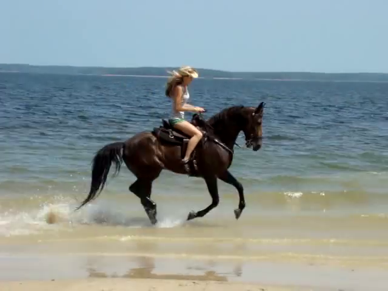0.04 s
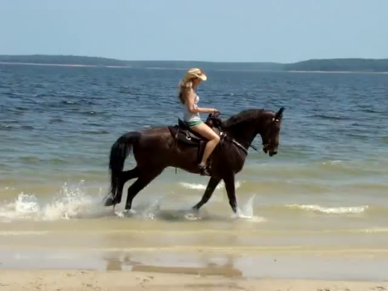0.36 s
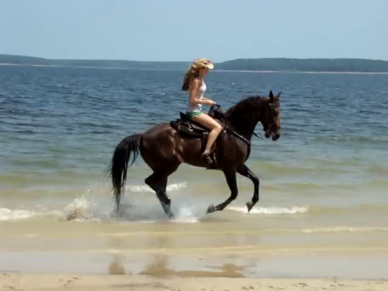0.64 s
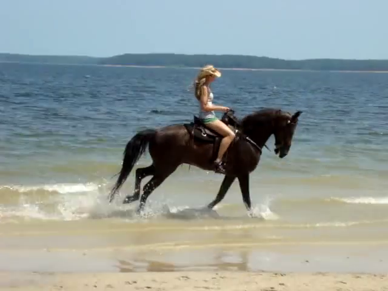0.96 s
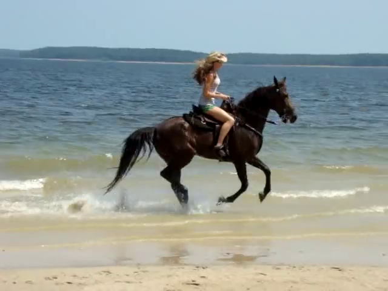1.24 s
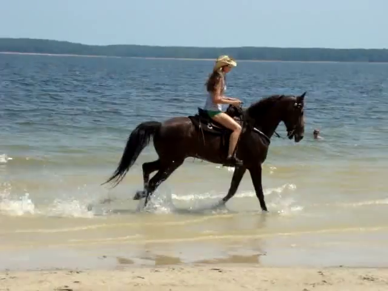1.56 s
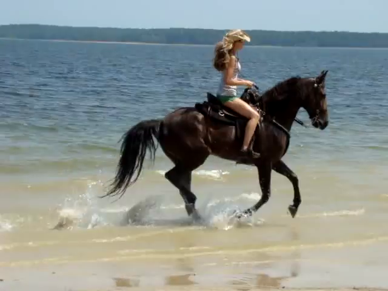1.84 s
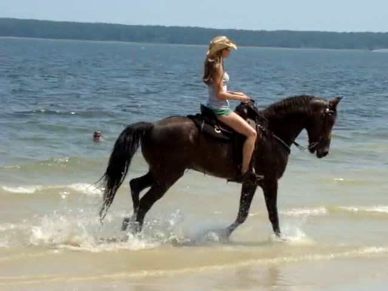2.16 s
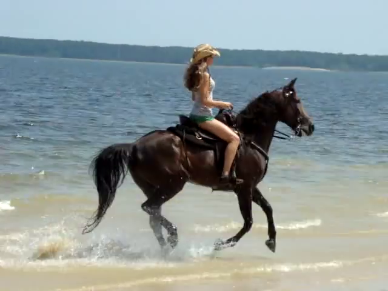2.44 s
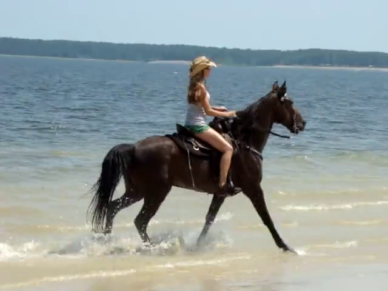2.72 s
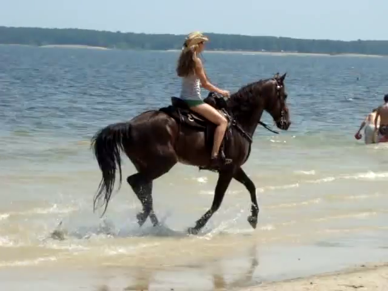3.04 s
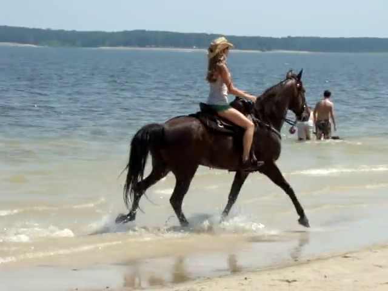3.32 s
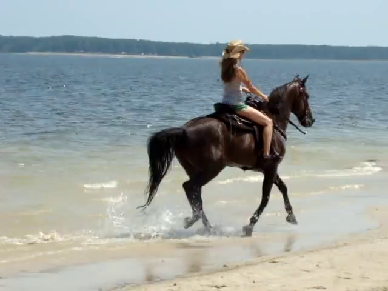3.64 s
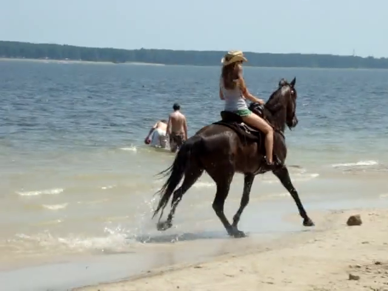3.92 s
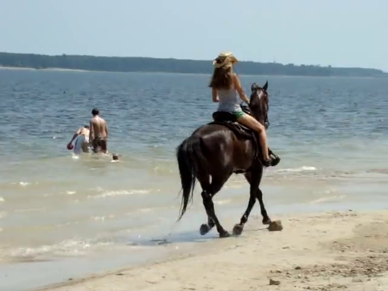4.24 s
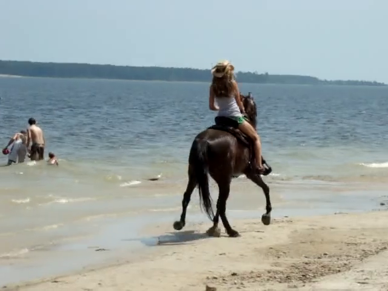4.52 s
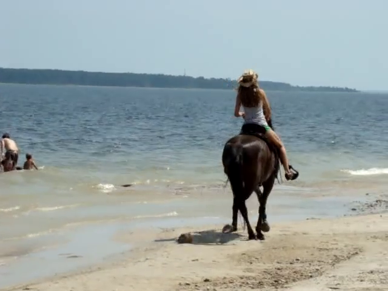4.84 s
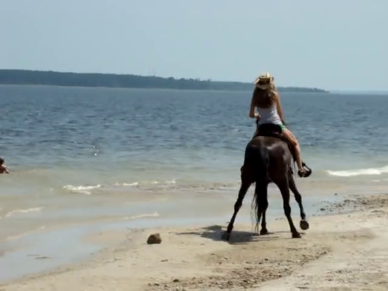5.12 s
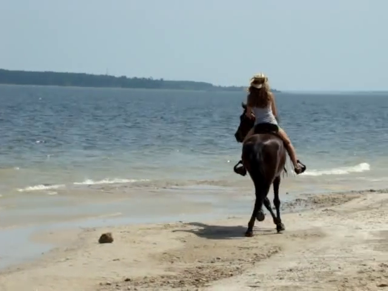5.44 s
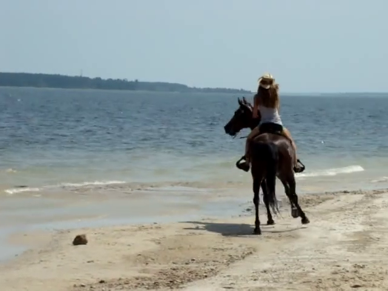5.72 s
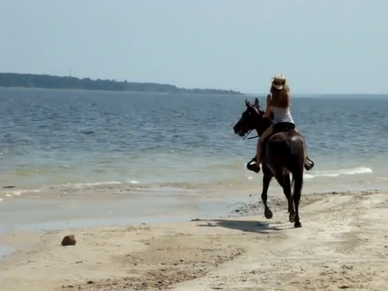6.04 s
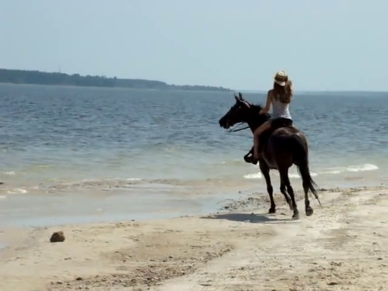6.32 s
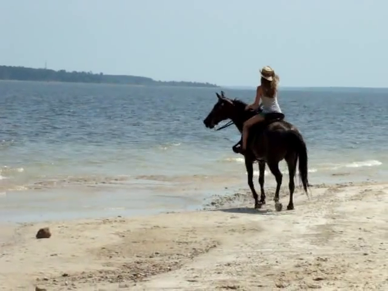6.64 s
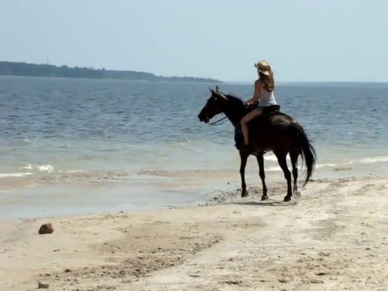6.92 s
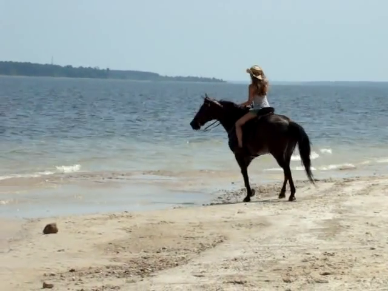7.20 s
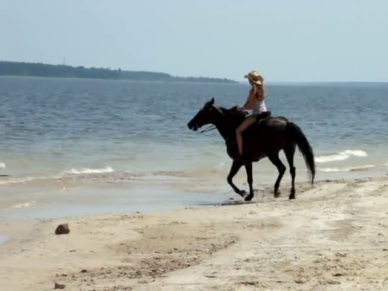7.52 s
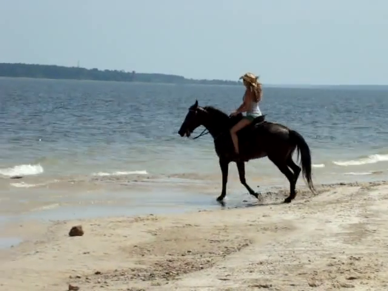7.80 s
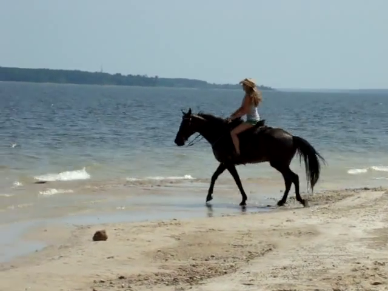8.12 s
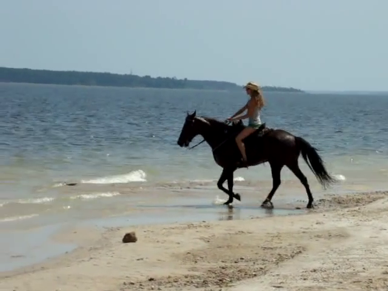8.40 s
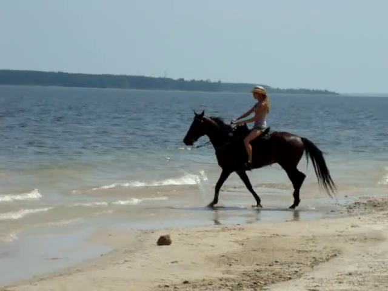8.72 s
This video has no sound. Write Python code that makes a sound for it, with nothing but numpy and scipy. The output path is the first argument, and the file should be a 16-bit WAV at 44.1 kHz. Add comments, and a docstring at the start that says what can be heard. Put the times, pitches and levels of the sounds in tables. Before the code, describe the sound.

A horse moves briskly through the shallows of a lake, each hoof landing with a slap, a gurgle and a patter of falling drops. Small waves wash steadily along the shore. Partway through, one long gust rumbles and thumps on the outdoor microphone. The splashing and the gust die away at about the same time, leaving the waves, with two faint wet steps near the end.

```python
"""A horse ambles through the shallows of a windy lake, steps out on to the sand and walks back
to the water's edge. Each hoof slaps the surface and raises a crown of water that falls back as drops.
Some steps gulp in a pocket of air that rings as a bubble, and lifting hooves fling spray.
Small waves wash along the shore throughout, and one long gust buffets the microphone."""
import sys
import numpy as np
from scipy import signal
from scipy.fft import rfft, irfft
from scipy.io import wavfile

SR = 44100
rng = np.random.default_rng(int(sys.argv[2]) if len(sys.argv) > 2 else 0)


def persist_wave(psi):
    """Save psi, clipped to +-1, as 16-bit WAV."""
    counts = np.round(np.clip(psi, -1, 1) * 32767).astype(np.int16)
    wavfile.write(sys.argv[1], SR, np.atleast_2d(counts).T)


N = 395136


def from_db(db):
    """Turn decibels into a number to multiply a sound by."""
    return 10 ** (np.asarray(db) / 20)


def rms_one(x):
    """Scale x so that its average strength (rms) is one."""
    return x / np.sqrt(np.mean(x ** 2) + 1e-20)


def seconds():
    """The time of every sample."""
    return np.arange(N) / SR


def in_time(rows):
    """Join (time, value) rows by straight lines."""
    return np.interp(seconds(), *np.transpose(rows))


def coloured(x, tone):
    """Shape x by (pitch, level) rows, fading steeply past both ends; the result has strength one."""
    hz, db = np.transpose(tone)
    octave, knots = np.log2(np.fft.rfftfreq(N, 1 / SR) + 1), np.log2(hz)
    octaves_outside = np.abs(octave - np.clip(octave, knots[0], knots[-1]))
    gain = from_db(np.interp(octave, knots, db) - 20 * octaves_outside)
    return rms_one(irfft(rfft(x) * gain, N))


def noise(tone):
    """A steady rush with the given tone."""
    return coloured(rng.standard_normal(N), tone)


def drift(rate_hz):
    """A smooth random wobble of strength one; a higher rate wobbles faster."""
    hop, warm_up = 40, 2000
    r = np.exp(-2 * np.pi * rate_hz * hop / SR)
    jitter = rng.standard_normal(N // hop + warm_up + 2)
    slow = signal.lfilter([1], [1, -2 * r, r * r], jitter)[warm_up:]
    return np.interp(np.arange(N) / hop, np.arange(len(slow)), rms_one(slow))


def swell(time_s, half_s):
    """The samples around a moment, and a bell-shaped rise and fall over them."""
    at = np.arange(max(int((time_s - 4 * half_s) * SR), 0), min(int((time_s + 4 * half_s) * SR), N))
    return at, np.exp(-.5 * ((at / SR - time_s) / half_s) ** 2)


def blend(layers, at, bright_db):
    """Mix the three layers of a splash: brighter means less of the low and more of the high."""
    low, middle, high = layers
    return from_db(-bright_db) * low[at] + middle[at] + from_db(bright_db) * high[at]


def drops(per_s, spread_db, cycles, clump_db, pitch_count=28):
    """Drops and bubbles of random size come in clumps, each ringing a few cycles at its own pitch."""
    starts = np.flatnonzero(rng.random(N) < per_s * from_db(clump_db * drift(25)) / SR)
    sizes = from_db(spread_db * np.minimum(rng.exponential(1, len(starts)), 4))
    sizes *= rng.choice([-1, 1], len(starts))
    pitches = np.geomspace(170, 10500, pitch_count)
    odds = np.sqrt(pitches) / np.sqrt(pitches).sum()   # small, high ones are more common
    picked = rng.choice(pitch_count, len(starts), p=odds)
    out = np.zeros(N)
    for k, hz in enumerate(pitches):
        clicks = np.full(N, 1e-18)
        clicks[starts[picked == k]] = sizes[picked == k]
        fade = np.exp(-np.log(1000) * hz / (max(cycles, 2) * SR))
        turn = 2 * np.pi * hz / SR
        ringing = signal.lfilter([1, 0, -1], [1, -2 * fade * np.cos(turn), fade * fade], clicks)
        out += np.sqrt(hz) * rms_one(ringing)
    return rms_one(out)


# How the waves on the shore rise and fall: (time [s], level [dB])
WAVE_LEVEL = [(0, -27), (1.05, -28), (2.6, -25.5), (3.9, -27.5), (4.7, -28.5), (6.2, -27.5), (6.6, -29),
              (7.75, -30), (8.1, -28.5), (8.96, -30)]
# The tone of the waves: (pitch [Hz], level [dB])
WAVE_TONE = [(40, -31), (90, -21), (160, -16), (220, -12), (330, -6), (500, -5.5), (750, 2), (1150, -3),
             (1550, -2), (2300, -7), (3100, -7), (4200, -13.5), (6700, -19.5), (10000, -24.5)]


def waves(gain_db=3.0, bubbles_db=-8, flutter_db=0.12):
    """Far-off little waves merge into a smooth rush; nearer ones add bubbling."""
    rush = rng.standard_normal(N)
    bubbling = from_db(bubbles_db) * drops(per_s=3000, spread_db=2.0, cycles=14.3, clump_db=2.5)
    level_db = in_time(WAVE_LEVEL) + gain_db + flutter_db * drift(4.9)
    return from_db(level_db) * coloured(rush + bubbling, WAVE_TONE)


# Water stirred by the legs, fading as the horse leaves the lake: (time [s], level [dB])
WADING_LEVEL = [(0, -30.5), (0.95, -33.5), (1.3, -32), (2.4, -33), (3.9, -34.5), (4.15, -39), (4.8, -40.5),
                (5.2, -49.5), (7.6, -56), (8.96, -45.5)]
# The tone of the stirred water: (pitch [Hz], level [dB])
WADING_TONE = [(130, -21), (210, -4), (400, -7.5), (700, 0.5), (1200, -19), (2100, -2.5), (3100, 2.5),
               (4300, -5.5), (7000, -6.5), (10000, -9)]


def wading(gain_db=1.9, flutter_db=1.5, stride_s=0.628, first_surge_s=0.044, surge_db=0.7):
    """Legs in the water keep up a patter of drops that surges once in each stride of four steps."""
    patter = coloured(drops(per_s=2400, spread_db=1.5, cycles=17, clump_db=2.5), WADING_TONE)
    surge = np.cos(2 * np.pi * (seconds() - first_surge_s) / stride_s)
    level_db = in_time(WADING_LEVEL) + surge_db * surge + gain_db + flutter_db * drift(28)
    return from_db(level_db) * patter


# The low gurgle, middle splash and high spray of struck water, each: (pitch [Hz], level [dB])
GURGLE_TONE = [(100, -18.5), (175, 1), (400, -5.5), (800, 5), (1300, -13.5), (2500, -13), (10000, -44)]
SPLASH_TONE = [(200, -25), (700, 0), (1500, -1.5), (3000, -0.5), (4500, -14), (10000, -22)]
SPRAY_TONE = [(500, -33), (2000, 1), (3500, 8), (5500, -1), (7500, -3), (10000, -3)]
# Each time a hoof lands: (time [s], level [dB], brightness [dB], fade time [s])
HOOF_STEPS = [(0.024, -27.5, 5, 0.011), (0.172, -27.5, -2, 0.023), (0.3265, -20, 3, 0.0078),
              (0.482, -22.5, 0, .006), (0.615, -30, 4, 0.028), (0.778, -25.5, -5.5, 0.027),
              (0.935, -19, 3.5, 0.0057), (1.084, -23, 0, .006), (1.210, -31, 6, .02),
              (1.360, -25.5, -3.5, 0.026), (1.530, -16.5, 1, 0.0035), (1.810, -22.5, 12.5, .0016),
              (1.967, -27, -9, .012), (2.110, -25, 4, .005), (2.359, -22, 1, 0.0062),
              (2.580, -26, -4, 0.023), (3.001, -19.5, -1, 0.0078), (3.183, -28, -7.5, 0.024),
              (3.310, -25, 1, 0.015), (3.583, -19, 3.5, .009), (3.787, -22, 1, 0.01),
              (4.066, -21.5, 0.5, 0.0035), (4.537, -30, -5, .012), (8.213, -36, -3, 0.028),
              (8.885, -35, -4, .016)]


def hooves(thud_db=-0.5, slap_db=0.9, spray_db=-3.0):
    """A hoof hits the water with a dull thud, a slap and a puff of spray."""
    thud = from_db(thud_db) * noise(GURGLE_TONE)
    slap = from_db(slap_db) * noise(SPLASH_TONE)
    spray = from_db(spray_db) * noise(SPRAY_TONE)
    out = np.zeros(N)
    for time_s, db, bright_db, fade_s in HOOF_STEPS:
        start = round(time_s * SR)
        at = np.arange(start, min(start + SR // 5, N))
        age = (at - start) / SR
        # A short, flat slap starts sharply; a long push through the water starts softly.
        rise_s = 0.00084 * (fade_s / 0.0083) ** 2.2
        shape = (1 - np.exp(-age / rise_s)) * np.exp(-age / fade_s)
        out[at] += from_db(db) * shape / shape.max() * blend((thud, slap, spray), at, bright_db)
    return out


# Large single bubbles: (time [s], level [dB], starting pitch [Hz], fade time [s])
AIR_POCKETS = [(0.040, -22, 203, .012), (0.184, -13, 1590, 0.0038), (0.484, -13, 620, .0057),
               (0.937, -19.5, 247, 0.0067), (1.080, -15, 402, .005), (1.0825, -11, 2780, .002),
               (1.5298, -8.5, 380, 0.003), (1.970, -15, 524, .005), (2.2950, 1, 2500, .00075),
               (3.0, -7, 1800, 0.0017), (3.7923, -9, 2920, .001), (4.067, -13, 610, 0.0025)]


def bubbles(rise=0.047, gain_db=1):
    """Air trapped by a hoof rings briefly and rises in pitch on its way to the surface."""
    out, age = np.zeros(N), np.arange(SR // 10) / SR
    for time_s, db, hz, fade_s in AIR_POCKETS:
        cycles = hz * age * (1 + rise * age / fade_s)
        ring = np.exp(-age / fade_s) * np.sin(2 * np.pi * cycles)
        out[round(time_s * SR) + np.arange(len(age))] += from_db(db + gain_db) * ring
    return out


# Spray flung by a lifting hoof: (loudest moment [s], half length [s], level [dB], brightness [dB])
FLUNG_SPRAY = [(0.09, 0.009, -26, 8.5), (0.717, 0.023, -24.5, 4.5), (1.431, 0.0074, -32, 10.5),
               (1.887, 0.014, -35, 8), (2.166, 0.0082, -27.5, 5), (2.43, 0.04, -32, 7.5),
               (2.956, .0063, -31.5, 8.5), (3.634, 0.0068, -24, 2.5)]


def falling_water(crown_delay_s=0.033, crown_half_s=0.01, crown_db=-9, crown_bright_db=-1):
    """The crown of water each step throws up, and flung spray, land as big bubbles, drops and mist."""
    gurgle = coloured(drops(per_s=5000, spread_db=0.5, cycles=15.6, clump_db=1.5), GURGLE_TONE)
    splash = coloured(drops(per_s=6000, spread_db=3.0, cycles=8.1, clump_db=2.0), SPLASH_TONE)
    spray = coloured(drops(per_s=3500, spread_db=2.0, cycles=5.7, clump_db=3.0), SPRAY_TONE)
    layers = (from_db(-4) * gurgle, from_db(0.2) * splash, from_db(-3.5) * spray)
    crowns = [(time_s + crown_delay_s, crown_half_s, db + crown_db, crown_bright_db)
              for time_s, db, _, _ in HOOF_STEPS]
    out = np.zeros(N)
    for time_s, half_s, db, bright_db in crowns + FLUNG_SPRAY:
        at, bell = swell(time_s, half_s)
        out[at] += from_db(db) * bell * blend(layers, at, bright_db)
    return out


# Faint air before and after one long gust: (time [s], level [dB])
WIND_LEVEL = [(0, -55), (2.0, -63), (2.15, -46), (2.42, -44), (2.5, -26.5), (2.68, -23), (2.86, -29.5),
              (2.94, -23.5), (3.2, -20.5), (3.5, -19), (3.93, -22.5), (4.1, -43), (4.45, -42), (4.7, -53),
              (5.25, -47.5), (7.45, -54), (7.7, -65), (8.96, -57)]
# Sudden thumps of wind: (loudest moment [s], half length [s], level [dB])
WIND_THUMPS = [(2.579, .02, -23), (2.762, 0.012, -15.5), (3.049, 0.0071, -15.5), (3.196, 0.016, -20),
               (3.33, 0.023, -20), (3.41, 0.024, -17), (3.499, .014, -15), (3.696, .005, -10),
               (3.885, .025, -20), (4.002, 0.0083, -22.5), (4.045, 0.0099, -21.5), (4.166, 0.022, -20.5),
               (4.42, 0.034, -36), (5.269, .02, -27.5), (5.472, .011, -38), (5.694, 0.022, -39),
               (8.733, .014, -32.5)]
# The tone of the wind's main rumble: (pitch [Hz], level [dB])
WIND_TONE = [(25, -36), (60, -19.5), (110, -3), (160, 2), (240, 1), (320, -4), (450, -11.5), (700, -28.5)]


def wind(gain_db=1.0, lumps_db=2.5, puffs_db=2.5, light_air_db=-43.5, strong_db=-19):
    """Air swirls at the microphone in a lumpy rumble: light air murmurs low, gusts flutter higher."""
    breeze_db = in_time(WIND_LEVEL)
    lightness = np.clip((light_air_db - breeze_db) / puffs_db, 0, 1)   # light air comes in slow puffs
    power = from_db(breeze_db + lumps_db * drift(35) + puffs_db * lightness * drift(3)) ** 2
    for time_s, half_s, db in WIND_THUMPS:
        at, bell = swell(time_s, half_s)
        power[at] += (from_db(db) * bell) ** 2
    force_db = np.maximum(10 * np.log10(power) - strong_db, -25)
    murmur_gain = from_db(-21 - 0.86 * force_db)
    flutter_gain = from_db(-10 + 0.78 * force_db)
    rumble = noise(WIND_TONE)
    murmur = murmur_gain * noise([(25, -13), (70, 1.5), (130, 1.0)])
    flutter = flutter_gain * noise([(220, -1), (320, -2), (500, -4.0), (900, -18.5)])
    return from_db(gain_db) * np.sqrt(power / (1 + murmur_gain ** 2)) * (rumble + murmur + flutter)


def scene(bass_cut_hz=165):
    """Horse, lake and wind meet at one microphone in the open air."""
    # Hoof strikes and bubbles are kept free of deep bass.
    no_bass = signal.butter(6, bass_cut_hz, "high", fs=SR, output="sos")
    plunges = signal.sosfilt(no_bass, hooves() + bubbles())
    return (waves() + wading() + plunges + falling_water() + wind())[None]


# Pitches the small microphone makes louder or softer: (pitch [Hz], width [Hz], level change [dB])
MIC_TONE = [(730, 200, -1.5), (1550, 130, 0.5), (1854, 280, -2), (2124, 240, 2), (3180, 340, -0.5),
            (4970, 330, 0.5), (5190, 310, 1.5), (7800, 490, -1)]


def record(dry, treble_cut_hz=10150):
    """The microphone colours the sound, rounds off the loudest peaks and loses the highest treble."""
    for hz, width_hz, db in MIC_TONE:
        band = signal.iirpeak(hz, hz / width_hz, fs=SR)
        dry = dry + (from_db(db) - 1) * signal.lfilter(*band, dry)
    treble_cut = signal.ellip(12, .1, 80, treble_cut_hz, fs=SR, output="sos")
    return signal.sosfilt(treble_cut, np.tanh(dry))


dry = scene()
out = record(dry)
persist_wave(out)
```